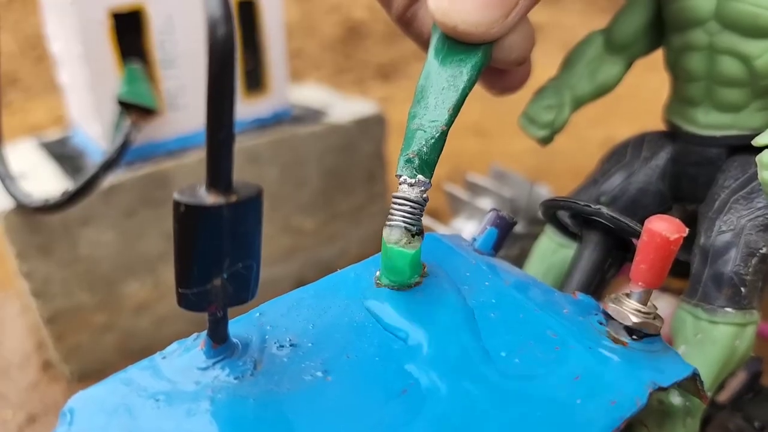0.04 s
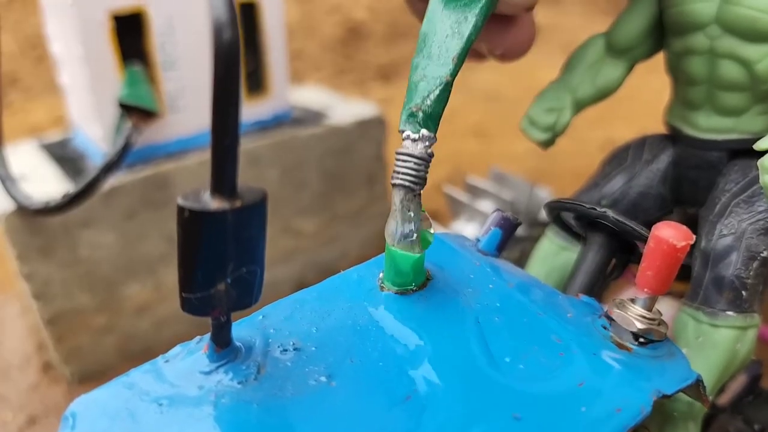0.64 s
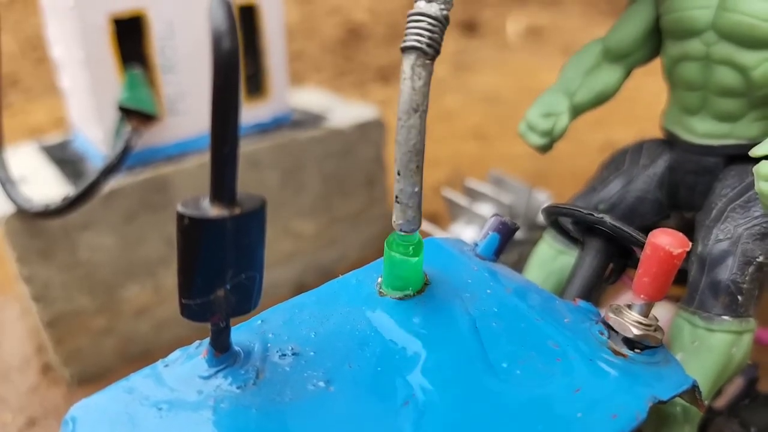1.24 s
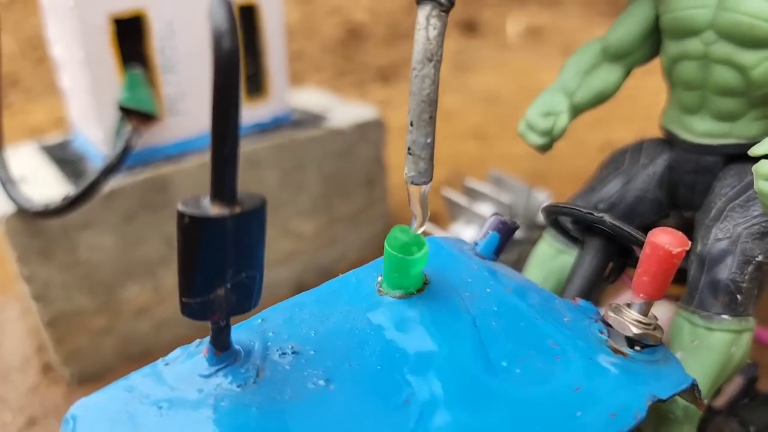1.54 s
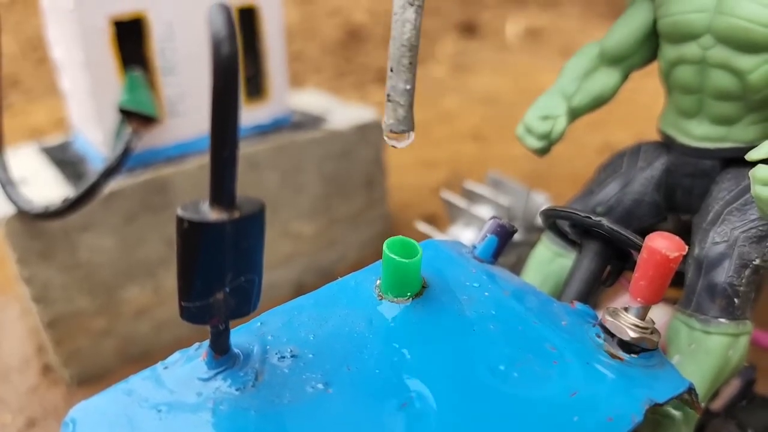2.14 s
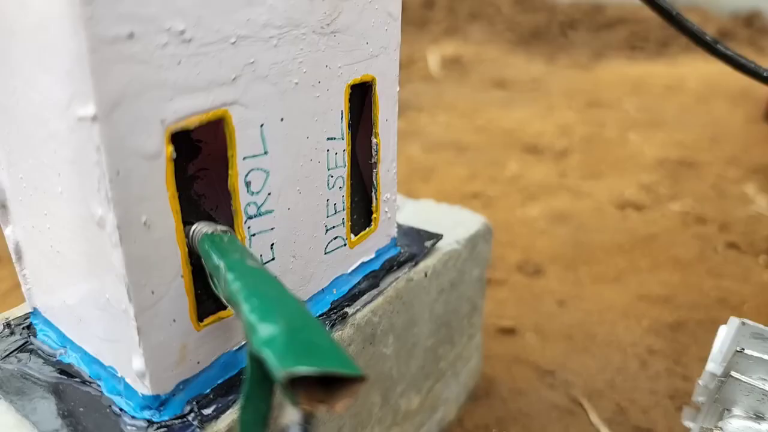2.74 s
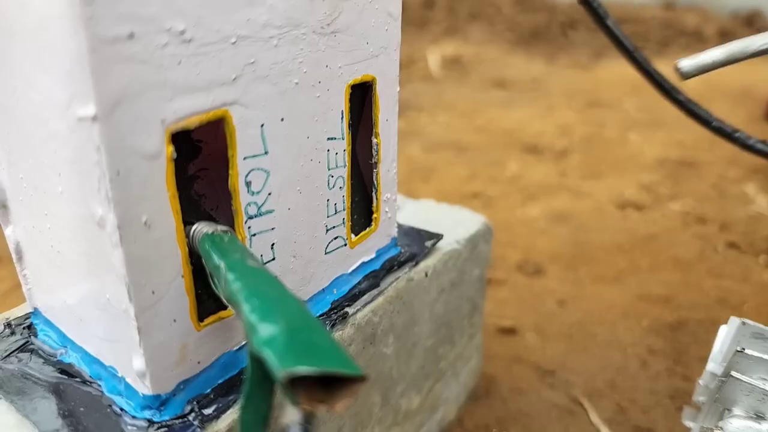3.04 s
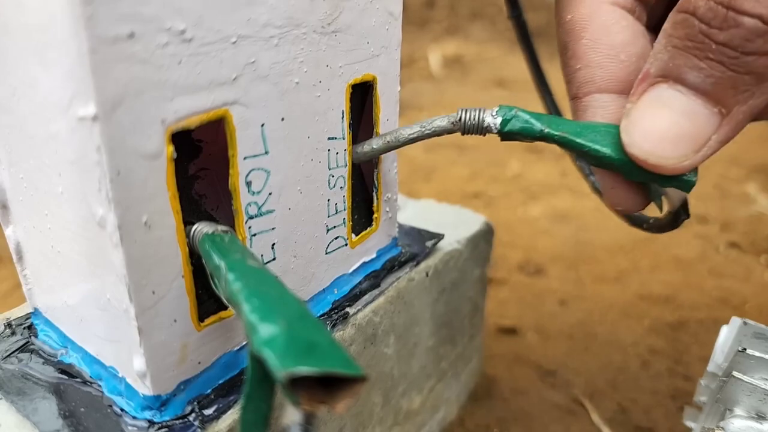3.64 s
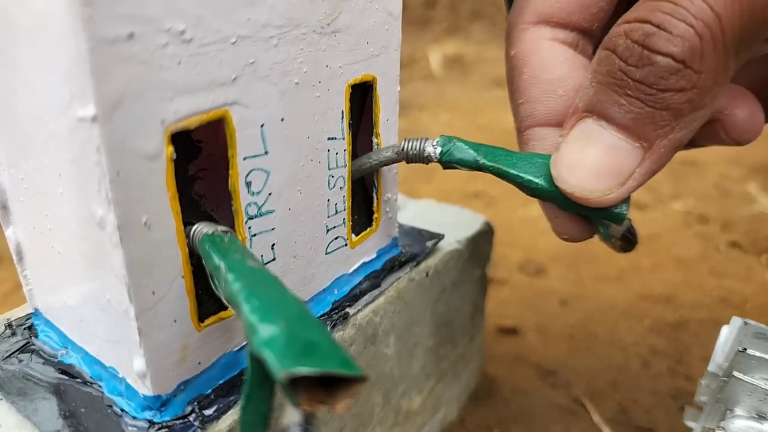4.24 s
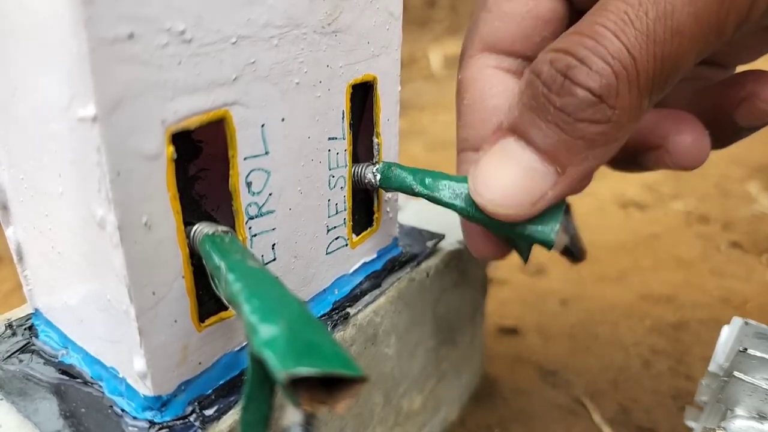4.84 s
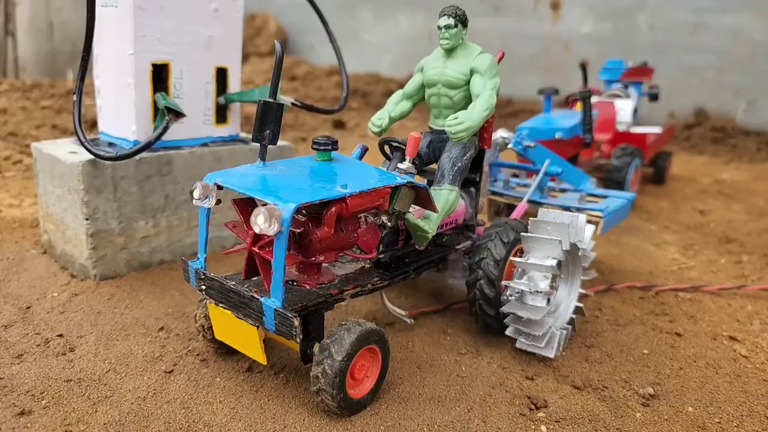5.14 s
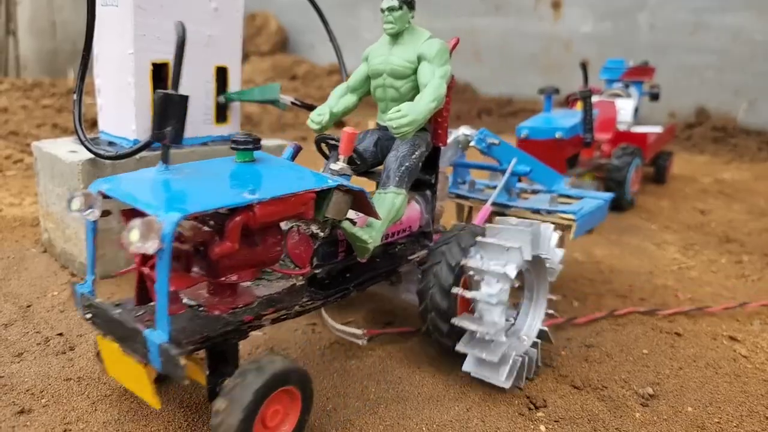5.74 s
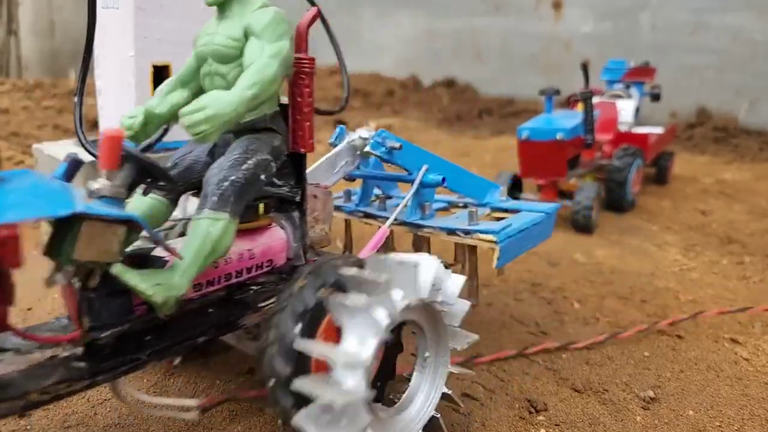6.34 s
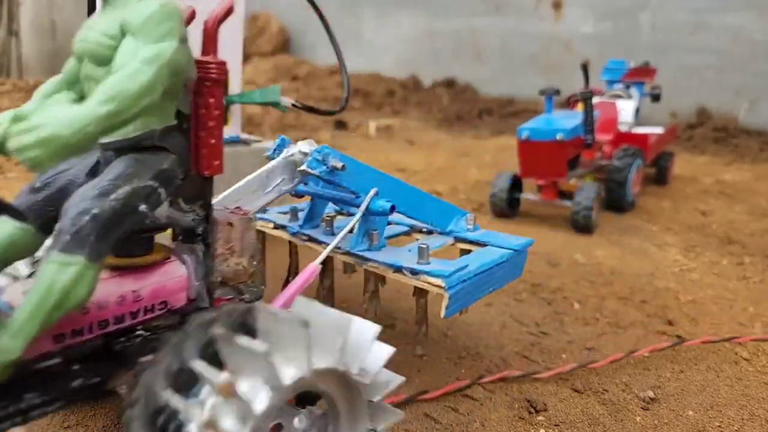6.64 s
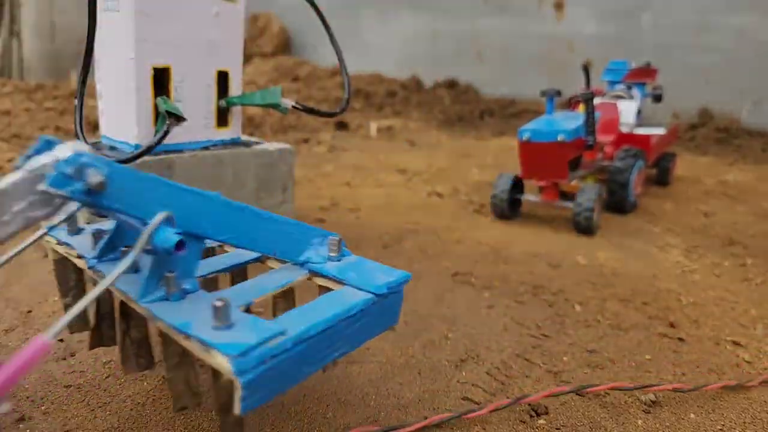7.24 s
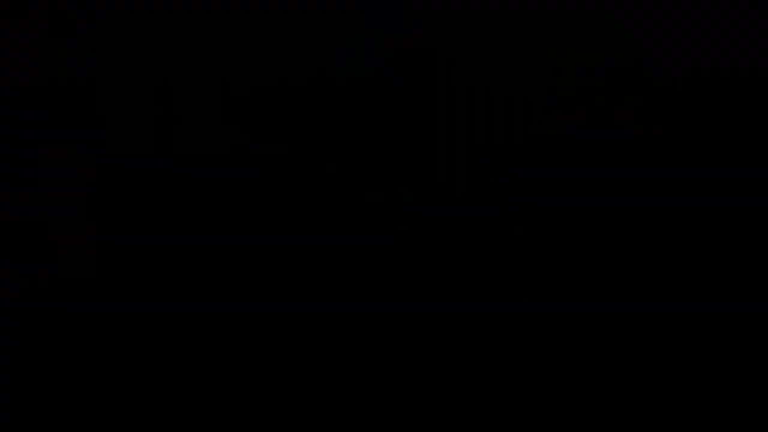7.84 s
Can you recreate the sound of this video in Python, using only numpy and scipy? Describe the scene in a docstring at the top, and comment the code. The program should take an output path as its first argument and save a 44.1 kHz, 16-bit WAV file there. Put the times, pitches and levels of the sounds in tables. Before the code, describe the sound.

A little pump motor buzzes with a thin whine in a yard, with light wind and high bird chirps around it. As it dies away, insects trill softly. Close to the microphone, a toy nozzle bumps a hollow pump housing in a run of loud knocks, its wire coil scraping the rim. Everything cuts out for an instant, then a tractor engine fires up and idles with a steady metallic clatter.

```python
"""A toy filling station outdoors. A small electric pump motor hums and rattles its casing in low wind
while two birds chirp; it fades by 2.5 s. Insects then trill with their wings over the yard's rumble.
From 4 s the nozzle knocks the hollow pump housing and its wire coil scrapes over the rim.
After a short silence, at 5.4 s, a four-cylinder tractor engine catches with six hard strokes
and settles into a clattering idle, each firing ringing the block."""
import sys
import numpy as np
from scipy import signal
from scipy.fft import rfft, irfft, next_fast_len
from scipy.io import wavfile
from scipy.ndimage import map_coordinates

SR = 44100
rng = np.random.default_rng(int(sys.argv[2]) if len(sys.argv) > 2 else 0)


def generate_wav(sig):
    """Save sig (samples, or channels by samples) to the path in sys.argv[1] as 16-bit PCM at SR."""
    pcm = np.round(np.clip(np.atleast_2d(sig).T, -1, 1) * 32767).astype(np.int16)
    wavfile.write(sys.argv[1], SR, pcm)


N = 356769
TIME = np.arange(N) / SR


# strokes as the engine catches: (time [s], level [dB], extra knock [dB])
CATCH_STROKES = [(5.457, -23.5, 7), (5.535, -24, 9.5), (5.597, -23.5, 9.5), (5.653, -22.5, 10),
                 (5.699, -21.5, 11.5), (5.742, -23.5, 13.5)]
# idling cylinders in firing order: (level [dB])
CYLINDER_DB = [-25, -25.5, -25, -23.5]
IDLE_START_S, FIRING_S = 5.7903, .04075
COLD_KNOCK_DB, WARM_UP_S = 2.5, 0.53

def firings():
    """Hard, quickening strokes, then the cylinders in turn; the last one knocks harder while cold."""
    k = np.arange(int((N / SR - IDLE_START_S) / FIRING_S))
    last_cylinder = (k + 1) % len(CYLINDER_DB) == 0
    cold_db = COLD_KNOCK_DB * np.exp(-k * FIRING_S / WARM_UP_S) * last_cylinder
    idle = zip(IDLE_START_S + k * FIRING_S, np.take(CYLINDER_DB, k, mode="wrap"), cold_db)
    return [*CATCH_STROKES, *idle]


def combustion():
    """Noise bursts that drive block, knock and bonnet; each cylinder partly repeats its own pattern."""
    lead_s = .02
    t = np.arange(SR // 8) / SR - lead_s
    chug = envelope(t + 0.0012, rise_s=.0022, hold_s=.011, t60_s=0.08)
    snap = envelope(t + 0.0019, rise_s=0.0036, hold_s=0.0043, t60_s=0.082)
    shake = envelope(t - .004, rise_s=.003, hold_s=0.015, t60_s=0.11)
    patterns = rng.standard_normal((len(CYLINDER_DB), len(t)))
    knots_hz = np.geomspace(500, 5000, 8)
    blows, ticks, clangs = np.zeros((3, N))
    for k, (s, db, knock_db) in enumerate(firings()):
        clatter = unit(patterns[k % len(patterns)] + 1.3 * rng.standard_normal(len(t)))
        shade = np.column_stack([knots_hz, rng.standard_normal(len(knots_hz))])  # 1 dB scatter
        clatter = equalise(clatter, shade)
        add(blows, s - lead_s, amp(db) * chug * clatter)
        add(ticks, s - lead_s, amp(db + knock_db) * snap * clatter[::-1])
    for s, db, _ in CATCH_STROKES:
        add(clangs, s - lead_s, amp(db) * shake * rng.standard_normal(len(t)))
    return blows, ticks, clangs


# engine block response: (frequency [Hz], gain [dB])
BLOCK_SPECTRUM = [(80, -4.5), (200, -6), (350, -3.5), (550, -3.5), (1100, 0.5), (1250, -2.5), (2400, -9.5),
                  (3600, -21.5), (4700, -26), (8000, -38.5), (11000, -46), (15000, -59.5)]
# block resonances: (frequency [Hz], relative gain [dB])
BLOCK_MODES = [(317.6, -44.5), (355.3, -42.5), (484.5, -50), (689.1, -50), (979.8, -47.5), (1152, -42.5),
               (1389, -47), (1647, -53.5), (2024, -52), (2400, -55), (3460, -54)]
# exhaust harmonics of the firing rate, from the first: (rms level [dB])
EXHAUST_DB = [-70, -42.5, -37.5, -74, -67, -48]

def tractor():
    """Firings ring the block; the first shake the bonnet, then the exhaust settles into a drone."""
    blows, ticks, clangs = combustion()
    settled = np.clip((TIME - 5.68) / .14, 0, 1)
    blows += amp(-33.5 + 3.1 * settled) * rng.standard_normal(N)  # gears and bearings
    ringing = sum(resonate(blows, [(hz, hz / 55 + 6, db)]) for hz, db in BLOCK_MODES)
    block = amp(9.5) * colour(blows, BLOCK_SPECTRUM) + amp(56.5) * lowpass(ringing, hz=3120)
    knock = amp(-3.5) * colour(ticks, [(700, -8), (1500, 3), (2900, 1), (4500, -12.5), (7000, -18),
                                       (10000, -38.5), (15000, -46)])
    bonnet_modes = [(820, 230, 10.4), (1400, 260, 10.3), (2130, 160, 5.3), (2810, 300, 7)]
    bonnet = lowpass(resonate(clangs, bonnet_modes), hz=3580)
    firing_phase = 2 * np.pi * (TIME - IDLE_START_S) / FIRING_S - 1
    exhaust = sum(np.sqrt(2) * amp(db + 0.63 * wobble(8)) * np.cos(order * firing_phase)
                  for order, db in enumerate(EXHAUST_DB, 1))
    stumble = amp(-34.5) * noise([(25, -10), (45, 1), (90, 3), (200, -13)])[0]
    stumble *= gate(5.5, 5.88, edge_s=0.12)
    engine = block + knock + bonnet + squeaks() + settled * exhaust + stumble
    return engine * gate(5.419, 8.055, edge_s=0.012)


# tractor squeaks: (time [s], pitch [Hz], relative level [dB])
SQUEAKS = [(6.14, 9000, -57), (6.27, 10750, -63)]

def squeaks(length_s=0.056):
    """Moving parts squeak, faint, hoarse and very high."""
    out = np.zeros(N)
    for s, hz, db in SQUEAKS:
        add(out, s, whistle(hz + 90 * wobble(150)[:int(length_s * SR)], db))
    return out


# nozzle on housing: (time [s], level [dB], low centre [Hz], upper centre [Hz],
# upper over low [dB], ring time [ratio], left over right [dB])
KNOCKS = [(4.008, -13, 296, 720, -0.5, 1.08, 2.5), (4.211, -21, 280, 900, -12, 0.83, 2.5),
          (4.305, -.8, 545, 1035, -8, 1.25, 1), (4.452, -20.5, 225, 800, -7, 2.4, 2.5),
          (4.464, -11, 506, 2250, -14, 0.89, 1.5), (4.49, -20, 600, 1000, -2.5, 1.4, 0),
          (4.544, -4, 355, 780, -10.5, .7, -2.5), (4.568, -14, 380, 900, -13, 1.1, -1),
          (4.581, -18, 380, 850, -9, 0.91, 1), (4.637, -23, 376, 904, -9, 2, 0),
          (4.716, -18.5, 490, 990, -6.5, 1.05, 2), (4.894, -13, 500, 1050, -8, 0.74, 1),
          (4.918, -20, 276, 1050, -3, 1.06, 0.5), (5.138, -2, 620, 1500, -6.5, 0.7, 0.5),
          (5.162, -19, 600, 1400, -16, 1.3, 1)]
# housing rocking on its block: (time [s], pitch [Hz], level [dB])
BUMPS = [(4.008, 108, -16), (4.305, 184, -17.5), (4.545, 275, -22), (4.894, 272, -20)]
CRACK_DB, CRACK_DB_PER_DB = -7, 1.84
HARD_HZ, SOFT_DB_PER_OCTAVE = 520, 15

def nozzle():
    """Each contact rings the hollow housing; hard ones crack, heavy ones rock it."""
    out = np.zeros((2, N))
    for s, db, low_hz, upper_hz, upper_db, ring, pan_db in KNOCKS:
        soft_db = SOFT_DB_PER_OCTAVE * min(np.log2(low_hz / HARD_HZ), 0)  # soft contacts crack less
        knock = thud(db, low_hz, upper_hz, upper_db, ring)
        knock += crack(CRACK_DB + CRACK_DB_PER_DB * db + soft_db, clink_db=-16)
        add(out[0], s, amp(pan_db / 2) * knock)
        add(out[1], s, amp(-pan_db / 2) * knock)
    rocking = np.zeros(N)
    t = np.arange(SR // 5) / SR
    for s, hz, db in BUMPS:
        attack = 1 - np.exp(-t * hz)
        add(rocking, s, amp(db) * attack * decay(t, t60_s=0.11) * np.sin(2 * np.pi * hz * t))
    out += coil() + rocking
    tail = amp(-10.5) * echo(lowpass(out.mean(0), hz=3000), t60_s=0.29)
    return (out + tail) * (TIME < 5.31)


# housing modes: (frequency [Hz], relative level [dB], t60 [s])
HOUSING_MODES = [(219, 1, 0.12), (275, -1.5, 0.11), (354, 0.5, 0.068), (430, -1, 0.055), (500, 2, 0.067),
                 (580, 2.5, 0.08), (675, 0, 0.062), (798, 4, 0.051), (989, 1, 0.055), (1132, 0, .06),
                 (1563, 2, .05), (1940, 2.5, 0.055), (2170, -2, 0.081)]

def thud(db, low_hz, upper_hz, upper_db, ring):
    """The housing rings and rattles; the spot struck picks low and upper modes, the hand damps them."""
    def reach(f, centre_hz):
        return 1 / (1 + (np.log2((f + 1) / centre_hz) / 0.43) ** 2)

    t = np.arange(SR // 5) / SR
    hz, mode_db, t60_s = np.transpose(HOUSING_MODES)[:, :, None]
    is_upper = hz > 730
    hz = hz * rng.normal(1, .015, hz.shape)  # the pressing nozzle detunes the walls
    low = amp(mode_db) * reach(hz, low_hz) * ~is_upper
    upper = amp(mode_db) * reach(hz, upper_hz) * is_upper
    gains = low / np.linalg.norm(low) + amp(upper_db) * upper / np.linalg.norm(upper)
    gains *= amp(rng.normal(0, 1, hz.shape))
    phase = 2 * np.pi * hz * (t - .005) + rng.normal(0, 0.55, hz.shape)
    modes = np.sum(gains * decay(t, t60_s * ring) * np.sin(phase), 0)
    walls = filtered(rng.standard_normal(len(t)),
                     lambda f: reach(f, low_hz) + amp(upper_db) * reach(f, upper_hz))
    rattle = unit(lowpass(walls, hz=2400)) * decay(t, t60_s=.11)
    return amp(db) * (amp(-1) * modes + amp(-14) * rattle) * (1 - np.exp(-t / 0.0029))


# contact noise: (frequency [Hz], relative density [dB])
CRACK_SPECTRUM = [(600, -11.5), (1800, -3), (2700, 0.5), (3500, -3), (5000, -1), (8000, -22),
                  (12000, -18.5), (15000, -34)]

def crack(db, clink_db):
    """A brief contact noise and the clink of the metal spout."""
    t = np.arange(SR // 5) / SR
    snap = unit(colour(rng.standard_normal(len(t)), CRACK_SPECTRUM))
    snap *= decay(t, t60_s=0.025) * (1 - np.exp(-t / 0.0011))
    clink = np.sin(2 * np.pi * 2660 * rng.normal(1, 0.032) * t) * decay(t, t60_s=0.044)
    return amp(db) * (snap + amp(clink_db) * clink)


# coil catching on the rim: (time [s], click [dB], scrape [dB], scrape hold [s])
COIL_CATCHES = [(4.304, -24, -26, .003), (4.463, -24.5, -37, 0.0018), (4.491, -30, -31, .005),
                (4.518, -25, -39, 0.0053), (4.567, -16.5, -31.5, .001), (4.636, -24.5, -43, 0.0018),
                (4.719, -27, -42, .008)]

def coil():
    """The spout's wire coil rubs over the rim, clicking and scraping where it catches."""
    out = amp(-49) * grit(N) * gate(4.45, 4.6, edge_s=0.036)
    t = np.arange(SR // 5) / SR
    for s, click_db, scrape_db, hold_s in COIL_CATCHES:
        slide = envelope(t - .002, rise_s=0.00075, hold_s=hold_s, t60_s=0.039)
        add(out, s, crack(click_db, clink_db=-5) + amp(scrape_db) * grit(len(t)) * slide)
    return out


def grit(size):
    """Bright, grainy friction of wire on the rim."""
    grains = rng.standard_normal(size) * amp(2.7 * rng.standard_normal(size))
    return unit(colour(grains, [(4000, -13), (7500, 5.5), (10500, -1.5), (13000, -6.5), (15300, -21.5)]))


# motor and casing tones: (frequency [Hz], relative level [dB])
MOTOR_TONES = [(236.9, -40), (893.6, -46), (1195, -46.5), (1314, -48), (1340, -39.5), (1373, -45.5),
               (1432, -41.5), (1464, -37.5), (1830, -42), (1857, -47), (1916, -35), (1949, -42.5),
               (1976, -44.5), (2008, -46.5), (2056, -45), (2745, -50.5), (3833, -50.5)]
# motor whine: (frequency [Hz], relative level [dB])
MOTOR_WHINE = [(5846, -47), (5965, -50)]
# swell near the casing's main resonance: (time [s], gain [dB])
TONE_SWELL = [(.42, -.5), (.53, 4.5), (.85, 2.5), (1.0, -.3)]
SWELL_HZ, SWELL_WIDTH_HZ = 1980, 150

def motor_tones(clock_s):
    """Wavering tones, roughened by the brushes."""
    swell_db = curve(TONE_SWELL)
    brushes = 0.19 * wobble(120)
    tones = np.zeros((2, N))
    for hz, db in [*MOTOR_TONES, *MOTOR_WHINE]:
        phase = rng.uniform(0, 2 * np.pi) + rng.normal(0, 0.29, (2, 1))
        nearness = np.exp(-((hz - SWELL_HZ) / SWELL_WIDTH_HZ) ** 2)
        gain = np.sqrt(2) * amp(db + swell_db * nearness + 1.3 * wobble(5.25))
        tones += gain * np.sin(2 * np.pi * hz * clock_s + phase + brushes)
    return tones


# pump and wind level, dipping briefly, then fading: (time [s], gain [dB])
PUMP_LEVEL = [(0.0, -29.5), (0.66, -28), (0.7, -34.5), (0.71, -28), (0.88, -27), (0.89, -29.5),
              (1.68, -28.5), (2.38, -35.5), (2.48, -37.5)]
# motor rush: (frequency [Hz], relative density [dB])
RUSH_SPECTRUM = [(88, -34), (150, 1), (239, -4.5), (272, -1.5), (477, -2), (1020, -11), (1420, -6),
                 (1730, -11.5), (1870, -8), (2380, -14.5), (2840, -14.5), (3450, -17.5), (5160, -23.5),
                 (5770, -18), (7000, -34), (9100, -61)]
# airy hiss: (frequency [Hz], relative density [dB])
AIR_SPECTRUM = [(2500, -16), (5000, -4.5), (7000, 1.5), (10500, -3.5), (11500, -12.5), (14000, -15),
                (14700, -36)]
# casing resonances: (frequency [Hz], width [Hz], relative gain [dB])
CASING_MODES = [(1486, 190, 0.5), (1900, 170, 2), (5780, 350, -14)]
# pump and wind stereo width: (frequency [Hz], side over mid [dB])
PUMP_WIDTH = [(60, 7), (150, 2), (500, -7.5), (2380, -9.5), (5980, -3), (15000, 0.5)]
SHAFT_HZ = 29.86

def pump():
    """Motor tones and hum over a rush; the armature rattles the casing alike on every turn."""
    clock_s = TIME + np.cumsum(0.00047 * wobble(4.82)) / SR  # the speed wanders slightly
    turns = SHAFT_HZ * clock_s
    tones = motor_tones(clock_s)
    one_turn = rng.standard_normal(round(SR / SHAFT_HZ))
    rattle = map_coordinates(one_turn, [turns % 1 * len(one_turn)], mode="grid-wrap")
    throb = amp(2.1 * np.sin(2 * np.pi * turns))
    casing = unit(resonate(throb * (rattle + 2 * rng.standard_normal((2, N))), CASING_MODES))
    rush = amp(1) * noise(RUSH_SPECTRUM) + amp(-10) * casing + amp(-18) * noise(AIR_SPECTRUM)
    pull = 2 * np.pi * 2 * turns  # the magnets pull twice a turn
    hum = amp(-26.5) * np.sin(pull) + amp(-32) * np.sin(2 * pull)
    return amp(curve(PUMP_LEVEL)) * (amp(28) * (tones + hum) + spread(rush, PUMP_WIDTH))


# near bird: (time [s], length [s], top pitch [Hz], droop [Hz], relative level [dB])
CHIRPS = [(.42, .06, 4600, 180, -42), (0.972, 0.1, 4520, 830, -28), (1.036, 0.033, 5500, 250, -41),
          (1.193, 0.042, 4390, -400, -36), (1.473, 0.078, 4770, 482, -36), (1.589, 0.022, 4400, 220.5, -24),
          (1.657, 0.027, 4460, 263, -22), (1.733, 0.026, 4465, 224, -20), (1.992, 0.096, 4440, 480, -38),
          (2.118, .032, 4700, 700, -42), (2.43, .065, 4770, 250, -43)]
# second bird: (time [s], relative level [dB])
WHISTLES = [(0.564, -43), (1.185, -37), (1.448, -37)]
SCOOP_HZ, SCOOP_S, DROOP_POWER, FLUTTER_DB = 447, 0.00595, 2.1, 2
WHISTLE_S, WHISTLE_HZ, WHISTLE_RISE_HZ = .145, 2950, 369

def birds():
    """One bird's chirps hold, then mostly droop; another's whistles rise; the yard echoes both."""
    song = np.zeros(N)
    for s, length_s, top_hz, droop_hz, db in CHIRPS:
        progress = np.linspace(0, 1, int(length_s * SR))
        scoop_hz = SCOOP_HZ * np.exp(-progress * length_s / SCOOP_S) * (length_s > .042)  # long ones
        add(song, s, whistle(top_hz - droop_hz * progress ** DROOP_POWER - scoop_hz, db))
    rise = np.sqrt(np.linspace(0, 1, int(WHISTLE_S * SR)))
    for s, db in WHISTLES:
        add(song, s, whistle(WHISTLE_HZ + WHISTLE_RISE_HZ * rise, db))
    song *= amp(FLUTTER_DB * wobble(110))
    return song + amp(-2.5) * echo(song, t60_s=0.17)


def whistle(hz, db):
    """One slightly hoarse note along a pitch contour."""
    arch = np.abs(np.sin(np.linspace(0, np.pi, len(hz)))) ** 0.55
    phase = 2 * np.pi * np.cumsum(hz) / SR + 0.37 * wobble(650)[:len(hz)]
    return amp(db + 2.5) * arch * (np.sin(phase) + amp(-26) * np.sin(2 * phase))


# low trills between phrases: (stroke rate [Hz], pitch [Hz], level [dB])
LOW_TRILLS = [(49.64, 3650, -42.5), (54.1, 3800, -44), (45, 3980, -45)]
# distant insects: (frequency [Hz], relative density [dB])
CHORUS_SPECTRUM = [(2600, -46.5), (3100, -9.5), (3900, 1.5), (4300, -11.5), (4700, -26), (5300, -11),
                   (5850, 3), (6600, -13.5), (7400, -3), (8000, -10), (8500, -53.5), (11300, -27.5),
                   (13500, -39.5), (15200, -47.5)]
# chorus and yard stereo width: (frequency [Hz], side over mid [dB])
YARD_WIDTH = [(25, 2.5), (65, -7.5), (130, -14.5), (400, -12.5), (1500, -1), (3600, 1), (8000, 2.5)]
PHRASE_START_S, PHRASE_PERIOD_S, PHRASE_DUTY = 2.51, .262, .82

def insects():
    """Three trills swell and drop in pitch in loosely shared phrases; a cricket chirps over a chorus."""
    starts_s = PHRASE_START_S + PHRASE_PERIOD_S * np.arange(int(N / SR / PHRASE_PERIOD_S))
    trills = 0
    for rate_hz, hz, db in LOW_TRILLS:
        effort = sum(gate(s, s + PHRASE_DUTY * PHRASE_PERIOD_S, edge_s=.03)
                     for s in starts_s + rng.normal(0, .012, len(starts_s)))
        strokes = np.cumsum(rate_hz + 2.5 * wobble(8)) / SR
        pitch_hz = hz - 240 * effort + 75 * wobble(30)
        wings = trill(strokes, pitch_hz, fall=.13 + .06 * effort, duty=.78, rough_rad=.52, bend=1.2)
        trills += amp(db + 1.2 * effort) * wings
    cricket = trill(24.05 * TIME - .45, 7340 + 25 * wobble(8.1), fall=.075, duty=.65, rough_rad=.1, bend=4)
    near = trills + amp(-44.5) * cricket
    chorus = amp(-39) * spread(noise(CHORUS_SPECTRUM), YARD_WIDTH)
    return (near + amp(-5.5) * echo(near, t60_s=0.078) + chorus) * gate(2.445, 5.31, edge_s=0.012)


def trill(strokes, hz, fall, duty, rough_rad, bend):
    """Each wing stroke is a short tone whose pitch falls as the wing slows."""
    progress = np.clip(strokes % 1 / duty, 0, 1)
    phase = 2 * np.pi * np.cumsum(hz * (1 + fall * (.5 ** bend - progress ** bend))) / SR
    gain = np.sin(np.pi * progress) * amp(1.76 * wobble(40))
    return unit(gain * np.sin(phase + rough_rad * wobble(700)))


# wind rumble: (frequency [Hz], relative density [dB])
WIND_SPECTRUM = [(22, -4), (43, 3), (61, 3.5), (124, -4.5), (183, -19), (242, -14), (260, -24), (340, -51)]

def wind():
    """A low rumble in light gusts that follows the pump's level."""
    gust_db = 0.54 * wobble(4.2) + 0.96 * wobble(13.8)
    return amp(curve(PUMP_LEVEL) + 5.5 + gust_db) * spread(noise(WIND_SPECTRUM), PUMP_WIDTH)


# outdoor rumble: (frequency [Hz], relative density [dB])
YARD_SPECTRUM = [(22, -32.5), (62, 0.5), (90, -8), (130, -6.5), (280, -18.5), (370, -22), (450, -25),
                 (1000, -26.5), (2600, -38.5)]
# nozzle handling noise: (frequency [Hz], relative density [dB])
HANDLING_SPECTRUM = [(71, -19), (120, 0.5), (323, -10), (620, -14), (700, -7.5), (790, -19), (1700, -15.5),
                     (1850, -13), (2040, -25), (2250, -12), (2400, -22), (2560, -13.5), (2720, -22),
                     (2950, -15), (3510, -43.5)]

def yard():
    """Low outdoor rumble, a faint wavering hum, and a soft hiss while the nozzle is handled."""
    rumble = amp(-43.5) * spread(noise(YARD_SPECTRUM), YARD_WIDTH)
    hum = amp(-53) * np.sin(2 * np.pi * 365 * TIME + 0.73 * wobble(35))
    hiss = amp(-39.5) * noise(HANDLING_SPECTRUM)[0] + amp(-49.5) * noise(CRACK_SPECTRUM)[0]
    return (rumble + hum) * gate(2.45, 5.31, edge_s=0.011) + hiss * gate(4.003, 5.31, edge_s=0.0055)


def amp(db):
    """Decibels to gain."""
    return 10 ** (np.asarray(db) / 20)


def unit(x):
    """Scaled to rms 1."""
    return x / np.sqrt(np.mean(x ** 2) + 1e-20)


def curve(points):
    """(time [s], value) points, interpolated per sample."""
    return np.interp(TIME, *np.transpose(points))


def wobble(rate_hz):
    """A smooth random curve with knots at rate_hz."""
    return map_coordinates(rng.standard_normal(int(N * rate_hz / SR) + 4), [TIME * rate_hz])


def gate(start_s, end_s, edge_s):
    """1 from start to end, with linear ramps."""
    return np.clip((TIME - start_s) / edge_s, 0, 1) * np.clip((end_s - TIME) / edge_s, 0, 1)


def decay(t, t60_s):
    """Falls 60 dB in t60_s."""
    return amp(-60 * t / t60_s)


def envelope(t, rise_s, hold_s, t60_s):
    """Climbs to 1 at t = 0, holds, then dies away."""
    return np.exp(np.minimum(t, 0) / rise_s) * decay(np.maximum(t - hold_s, 0), t60_s)


def filtered(x, response):
    """x through a complex frequency response."""
    size = x.shape[-1]
    padded = next_fast_len(size + 8192)
    return irfft(rfft(x, padded) * response(np.fft.rfftfreq(padded, 1 / SR)), padded)[..., :size]


def lowpass(x, hz):
    """A steep, smooth treble cut."""
    return filtered(x, lambda f: 1 / (1 + (f / hz) ** 4))


def equalise(x, points):
    """x through (frequency [Hz], gain [dB]) points on a log axis."""
    hz, db = np.transpose(points)
    return filtered(x, lambda f: amp(np.interp(np.log(f + 1), np.log(hz + 1), db)))


def colour(x, spectrum):
    """x shaped by a spectrum that falls steeply beyond its ends."""
    return equalise(x, [(spectrum[0][0] / 2, -100), *spectrum, (spectrum[-1][0] * 2, -100)])


def resonate(x, modes):
    """x through (frequency [Hz], width [Hz], gain [dB]) resonances of alternating sign."""
    return filtered(x, lambda f: sum((-1) ** k * amp(db) * 1j * f * width / (hz**2 - f**2 + 1j * f * width)
                                     for k, (hz, width, db) in enumerate(modes)))


def noise(spectrum):
    """Two unrelated coloured noises."""
    return unit(colour(rng.standard_normal((2, N)), spectrum))


def spread(pair, width):
    """Left and right from mid and side."""
    mid, side = pair[0], equalise(pair[1], width)
    return np.array([mid + side, mid - side])


def add(track, s, sound):
    """Mixes a sound in at s seconds."""
    part = track[round(s * SR):][:len(sound)]
    part += sound[:len(part)]


def echo(x, t60_s):
    """A diffuse stereo tail."""
    t = np.arange(SR // 2) / SR
    tail = rng.standard_normal((2, len(t))) * decay(t, t60_s)
    return signal.fftconvolve(x[None], tail / np.linalg.norm(tail[0]), axes=1)[:, :N]


def scene():
    """All sources, left and right."""
    pumping = (pump() + wind()) * gate(-0.022, 2.51, edge_s=0.02)
    return pumping + birds() + insects() + yard() + nozzle() + tractor()


CEILING_DB, TOP_HZ = -1.3, 15500

def record(dry):
    """Rounds off the hardest peaks and cuts the top treble."""
    limited = dry / (1 + (dry / amp(CEILING_DB)) ** 8) ** (1 / 8)
    return filtered(limited, lambda hz: hz < TOP_HZ)


dry = scene()
out = record(dry)
generate_wav(out)
```